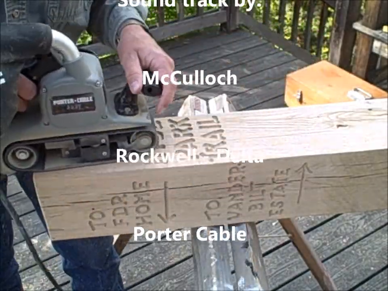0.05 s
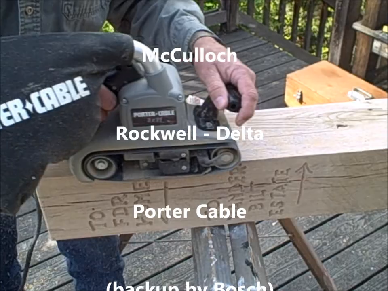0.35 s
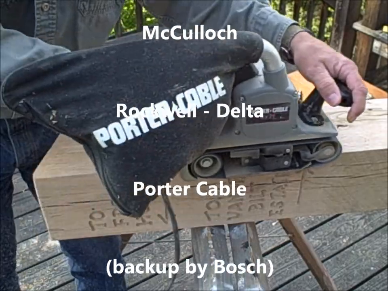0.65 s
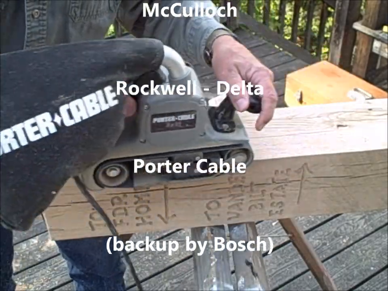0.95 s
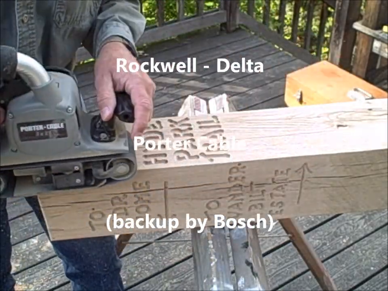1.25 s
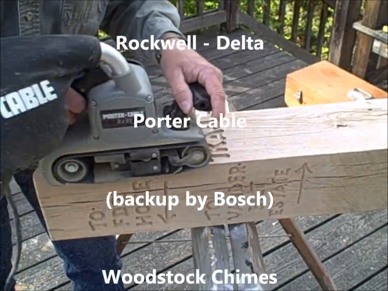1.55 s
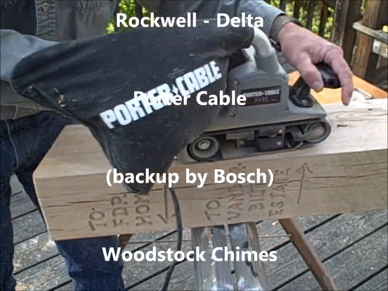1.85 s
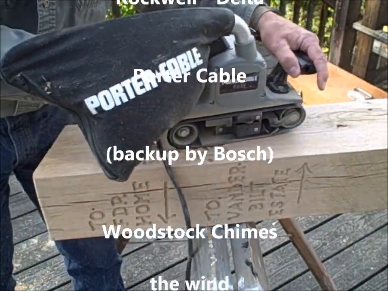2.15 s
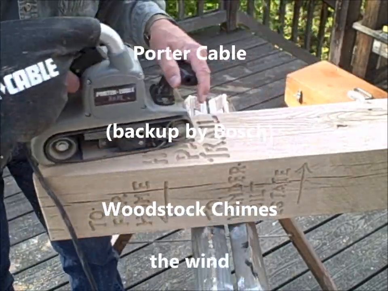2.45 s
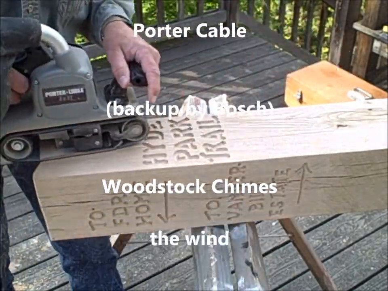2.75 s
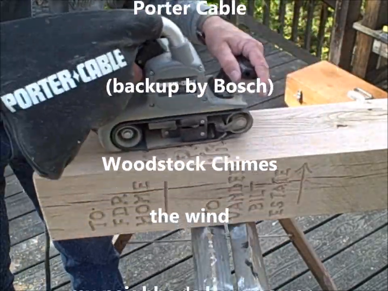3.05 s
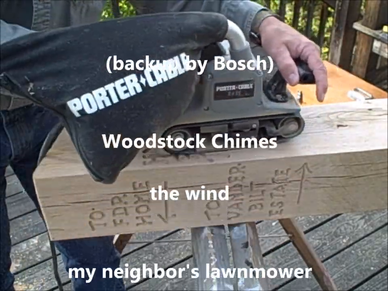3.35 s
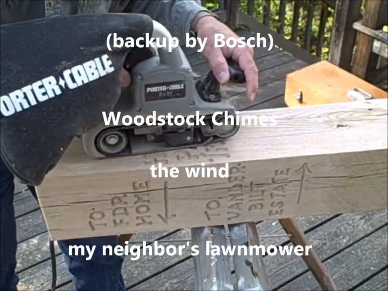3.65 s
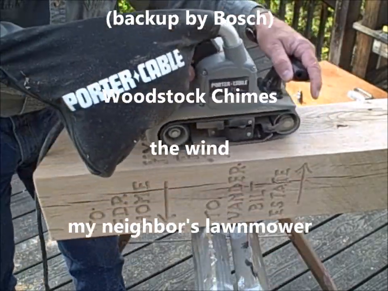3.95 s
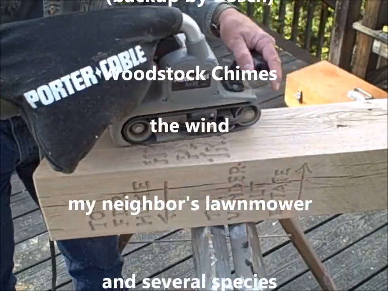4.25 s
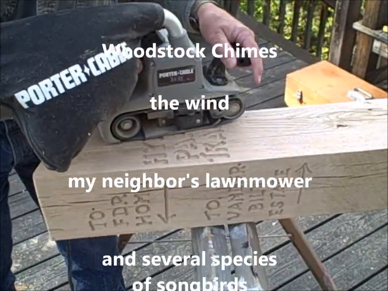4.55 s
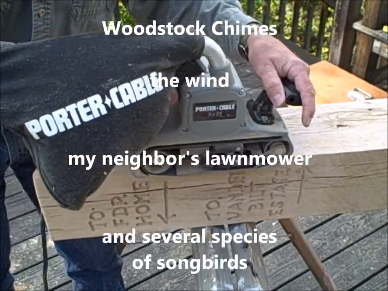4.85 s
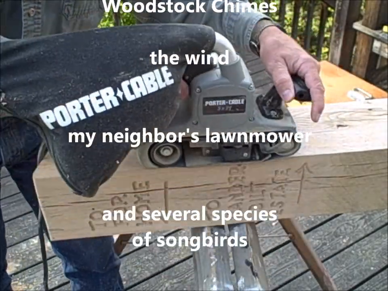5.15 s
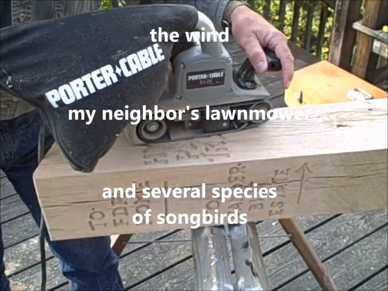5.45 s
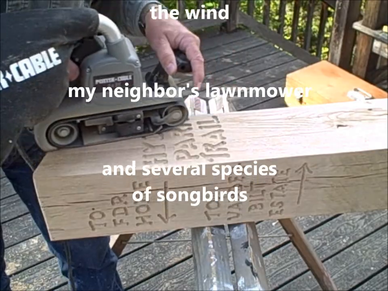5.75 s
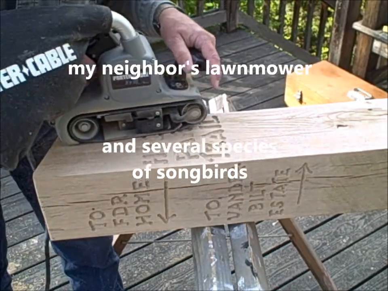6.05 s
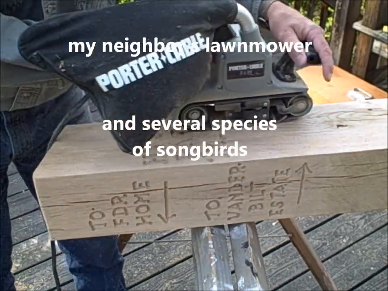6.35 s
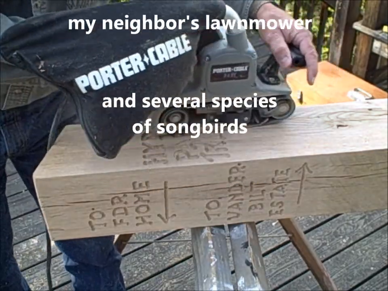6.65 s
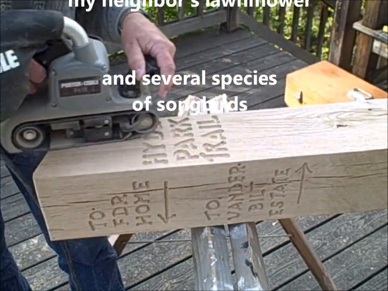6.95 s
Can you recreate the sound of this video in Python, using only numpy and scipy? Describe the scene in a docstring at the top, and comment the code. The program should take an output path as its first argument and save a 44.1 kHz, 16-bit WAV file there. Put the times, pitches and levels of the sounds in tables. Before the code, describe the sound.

A belt sander is already running as it is pushed back and forth along a wooden post. Its motor gives a high, wavering whine over a bright, rapidly throbbing hiss and a rasp of wood. A few splinters tick sharply. The pitch sags slightly around the middle, then recovers, and the rasp eases near the end. It is heard close by, outdoors.

```python
"""A belt sander is pushed to and fro along a wooden post on an open deck, heard close by in mono.
From the start, fan and armature slots whine, a gear drives the roller, and grit tears at the wood
with a hiss that throbs once per roller turn. From half a second on, larger splinters tick.
The motor sags under load and is slowest near 4 s, just after the loudest splinter.
By 6 s it has regained its speed, and in the last second the rasp and hiss ease."""
import sys
import numpy as np
from scipy import signal
from scipy.fft import rfft, irfft, next_fast_len
from scipy.io import wavfile
from scipy.ndimage import map_coordinates

SR = 44100
rng = np.random.default_rng(int(sys.argv[2]) if len(sys.argv) > 2 else 0)


def inscribe(sig):
    """Save sig as 16-bit PCM at rate SR to the path in sys.argv[1].

    A 1-D sig is mono; a 2-D sig holds one channel per row.
    Samples are clipped to [-1, 1] before scaling.
    """
    pcm = np.round(np.clip(np.atleast_2d(sig).T, -1, 1) * 32767)
    wavfile.write(sys.argv[1], SR, pcm.astype(np.int16))


N = 309582
FAN_BLADES, ARMATURE_SLOTS = 12, 11
MESHES_PER_TURN, ROLLER_TEETH = 16 / 3, 45


def from_db(db):
    """Amplitude grows tenfold for every 20 dB."""
    return 10 ** (np.asarray(db) / 20)


def unit_rms(x):
    """Normalisation to an rms of 1."""
    return x / np.sqrt(np.mean(x ** 2) + 1e-20)


def curves(rows):
    """Linear interpolation of each column of a time table at every sample."""
    time_s, *columns = np.transpose(rows)
    return [np.interp(np.arange(N) / SR, time_s, column) for column in columns]


def gain_curves(rows):
    """Linear interpolation in amplitude of each dB column of a time table."""
    time_s, *columns = np.transpose(rows)
    return [np.interp(np.arange(N) / SR, time_s, from_db(db)) for db in columns]


def drift(rate_hz):
    """Low-pass filtered noise: a slow random fluctuation of rms 1."""
    pole = np.exp(-40 * np.pi * rate_hz / SR)
    noise = rng.standard_normal(N // 20 + 2002)   # one value per 20 samples
    slow = signal.lfilter([1], [1, -2 * pole, pole * pole], noise)[2000:]
    return np.interp(np.arange(N) / 20, np.arange(len(slow)), unit_rms(slow))


def coloured(x, spectrum):
    """Source and filter: a frequency response shapes the excitation x; rms 1."""
    hz, db = np.transpose(spectrum)
    size = next_fast_len(N)
    bins_hz = np.maximum(np.fft.rfftfreq(size, 1 / SR), 1)
    gain = from_db(np.interp(np.log(bins_hz), np.log(hz), db, left=-80, right=-80))
    return unit_rms(irfft(rfft(x, size) * gain, size)[:N])


def grit(per_s, spread_db):
    """Shot noise: countless tiny fractures of uneven size at random instants; rms 1."""
    fractures = rng.random(N) < per_s / SR
    return unit_rms(fractures * rng.standard_normal(N) * from_db(spread_db * rng.standard_normal(N)))


def partials(cycles, orders, flutter_db, flutter_hz):
    """Rotational orders: tones at fixed multiples of a rotation rate, each fluttering on its own."""
    tones = 0
    for order, db in orders:
        amplitude = np.sqrt(2) * from_db(db + flutter_db * drift(flutter_hz))
        tones += amplitude * np.sin(2 * np.pi * (order * cycles + rng.random()))
    return tones


# The post shaking under the roller: time_s, hum_db, judder_db
SHAKE_LEVELS = [(0.0, -90, -84), (0.12, -73, -76), (0.17, -75, -74), (0.33, -77, -87), (0.39, -78, -74),
                (0.49, -70, -84), (0.6, -77, -75), (0.68, -84, -84), (0.74, -78, -89), (0.8, -80, -75),
                (0.94, -71, -80), (1.04, -80, -80), (1.17, -74, -78), (1.54, -79, -71), (1.56, -80, -73),
                (1.9, -79, -76), (1.93, -73, -83), (2.01, -72, -75), (2.21, -83, -83), (2.4, -70, -79),
                (2.54, -79, -78), (2.79, -73, -76), (2.87, -70, -67), (2.95, -72, -76), (3.13, -83, -78),
                (3.17, -72, -80), (3.26, -71, -75), (3.46, -85, -77), (3.62, -73, -81), (3.68, -74, -68),
                (3.71, -66, -78), (3.77, -74, -71), (3.81, -70, -69), (4.03, -70, -74), (4.14, -74, -81),
                (4.38, -71, -72), (4.5, -75, -82), (4.91, -74.5, -78), (5.18, -85, -81), (5.3, -81, -71),
                (5.51, -77, -90), (5.59, -76, -79), (5.85, -84, -81), (5.87, -78, -82), (6.1, -74, -72),
                (6.16, -81, -77), (6.26, -82, -88), (6.43, -91, -85), (6.51, -79, -82), (6.61, -85, -85),
                (6.8, -77, -79), (6.88, -89, -85), (7.02, -79, -87)]
# Spectrum of the rumble around the hum: frequency_hz, gain_db
RUMBLE_SPECTRUM = [(20, -1), (45, -3), (62, 3), (80, -2), (97, -10), (130, -20), (300, -40)]
# Partials of the roller's knock: cycles_per_turn, level_db
KNOCK_ORDERS = [(3, -5.5), (4, -11.5)]
# Spectrum of the sander's bouncing: frequency_hz, gain_db
JUDDER_SPECTRUM = [(85, -20), (105, 0), (120, -2), (135, -.5), (155, -1), (180, -11), (300, -28)]


def shake(roller_turns):
    """Forced vibration: the roller presses twice a turn, a hum; the bouncing sander adds judder."""
    hum_db, judder_db = curves(SHAKE_LEVELS)
    hum = partials(roller_turns, [(2, -1.0)], flutter_db=1.5, flutter_hz=6)
    hum += from_db(-3.5) * coloured(rng.standard_normal(N), RUMBLE_SPECTRUM)
    judder = partials(roller_turns, KNOCK_ORDERS, flutter_db=2.5, flutter_hz=4)
    judder += from_db(-3.0) * coloured(rng.standard_normal(N), JUDDER_SPECTRUM)
    return from_db(hum_db) * hum + from_db(judder_db) * judder


# Mesh tone and tooth whistle of the gear: time_s, mesh_db, whistle_db
GEAR_LEVELS = [(0.0, -61.0, -60), (0.23, -69, -62), (0.45, -66, -61), (0.68, -61.0, -73), (0.91, -57, -72),
               (1.13, -63.0, -60), (1.36, -63, -62.0), (1.59, -66.0, -58.5), (1.81, -61.5, -67),
               (2.04, -60.5, -59.5), (2.26, -63, -62), (2.49, -56.5, -58.0), (2.72, -66, -53.5),
               (2.94, -69, -54.5), (3.17, -59.5, -61), (3.4, -64, -70.0), (3.62, -61.0, -65),
               (3.85, -60.0, -74), (4.08, -60, -68.0), (4.3, -61.0, -62.0), (4.53, -69, -68.0),
               (4.76, -62, -73), (4.98, -61.0, -68.0), (5.21, -64.0, -69.0), (5.43, -75, -71),
               (5.66, -66, -63), (5.89, -71.0, -65.0), (6.11, -76.0, -65), (6.34, -68, -65.0),
               (6.57, -66, -67.0), (6.79, -69, -70.0), (7.02, -69.0, -68.0)]
# Partials of the tooth whistle: cycles_per_motor_turn, level_db
WHISTLE_ORDERS = [(16, .3), (14.667, -6)]


def gear(motor_turns, wobble):
    """Amplitude modulation: the off-centre gear presses its teeth harder once per roller turn."""
    mesh_gain, whistle_gain = gain_curves(GEAR_LEVELS)
    mesh = mesh_gain * partials(motor_turns, [(MESHES_PER_TURN, 0)], flutter_db=1.9, flutter_hz=5.4)
    whistle = whistle_gain * partials(motor_turns, WHISTLE_ORDERS, flutter_db=2.2, flutter_hz=15)
    return mesh * (1 + 0.56 * wobble) + whistle * (1 + 0.51 * wobble)


# Whine of the armature slots: time_s, fundamental_db, overtones_db
SLOT_LEVELS = [(0.0, -66, -59.5), (0.23, -62, -70.0), (0.38, -62.5, -66.5), (0.45, -57.5, -68.5),
               (0.52, -55.5, -58.0), (0.61, -60, -53), (0.75, -64.5, -69.0), (0.87, -60, -51.5),
               (0.98, -53, -52), (1.05, -54.5, -56), (1.15, -67, -62.0), (1.27, -57, -63.5),
               (1.37, -65, -60.0), (1.62, -60.0, -67.5), (1.73, -56.0, -59.0), (1.82, -59, -55),
               (2.03, -69.0, -69), (2.15, -63.0, -63.0), (2.31, -77.5, -65.5), (2.58, -62, -57),
               (2.77, -58.5, -69.0), (2.92, -63, -65.5), (2.98, -56, -64.0), (3.14, -69.0, -61.0),
               (3.37, -69, -71.5), (3.67, -76.0, -63), (3.9, -63.0, -66.0), (4.24, -66, -71.5),
               (4.53, -62, -56.5), (4.69, -68, -60.5), (4.85, -65.0, -62.0), (4.98, -59, -58),
               (5.2, -62, -58.5), (5.3, -58.5, -67.5), (5.37, -65.0, -72.5), (5.48, -79.5, -62.5),
               (5.62, -63.5, -64.0), (5.72, -65.5, -59.5), (6.11, -67.5, -74.0), (6.23, -64, -61.0),
               (6.55, -78.5, -77.5), (7.02, -67, -65)]
# Harmonics 2 to 4 of the slot tone: cycles_per_turn, level_db
SLOT_ORDERS = [(22, -1), (33, -17), (44, -20)]


def armature(motor_turns):
    """Slot-passing tone: the armature sings at shaft speed times slot count, just below the fan."""
    tone_gain, overtone_gain = gain_curves(SLOT_LEVELS)
    tone = partials(motor_turns, [(ARMATURE_SLOTS, -.2)], flutter_db=2.4, flutter_hz=25)
    overtones = partials(motor_turns, SLOT_ORDERS, flutter_db=1.0, flutter_hz=23)
    return tone_gain * tone + overtone_gain * overtones


# The fan's fundamental, swelling and fading as the sander moves: time_s, level_db
FAN_LEVEL = [(0.0, -49), (0.12, -49), (0.18, -51.5), (0.21, -71.0), (0.28, -47.5), (0.33, -45.5),
             (0.46, -68.5), (0.52, -52), (0.57, -67.0), (0.67, -53), (0.72, -59), (0.91, -63.0),
             (0.97, -51.5), (1.06, -51), (1.11, -63), (1.15, -50.0), (1.19, -49.5), (1.27, -60),
             (1.41, -51.5), (1.44, -55.0), (1.5, -51.5), (1.58, -74.0), (1.65, -49.5), (1.7, -59),
             (1.82, -47.5), (1.86, -52), (1.9, -48.5), (1.98, -54.0), (2.09, -49.0), (2.19, -49.0),
             (2.23, -47.0), (2.3, -50.5), (2.33, -46.5), (2.41, -48.5), (2.5, -63.0), (2.57, -56),
             (2.6, -49), (2.65, -51), (2.76, -57.5), (2.82, -58.0), (2.92, -50.5), (2.96, -55),
             (3.02, -50.5), (3.05, -54.0), (3.14, -48.0), (3.21, -47.5), (3.3, -61), (3.34, -55.0),
             (3.44, -51.5), (3.48, -59), (3.56, -57), (3.6, -49.5), (3.83, -55), (3.91, -52), (3.97, -55.5),
             (4.08, -49.5), (4.2, -60), (4.29, -47), (4.31, -47), (4.34, -56), (4.4, -46), (4.52, -48.5),
             (4.59, -47.5), (4.67, -43.5), (4.72, -44.0), (4.78, -57.5), (4.82, -48.5), (4.88, -54),
             (4.92, -48), (5.0, -67), (5.08, -52), (5.19, -67.5), (5.25, -50.0), (5.34, -51.0), (5.42, -63),
             (5.52, -48.5), (5.64, -47), (5.74, -49), (5.79, -63), (5.83, -52), (5.89, -54.5),
             (5.98, -50.0), (6.03, -52.5), (6.11, -50.5), (6.17, -51.0), (6.31, -50.0), (6.37, -55),
             (6.41, -51), (6.46, -60), (6.53, -53.0), (6.63, -51.5), (6.69, -54.0), (6.84, -49.0),
             (6.91, -58.5), (6.94, -53.5), (7.02, -67)]
# The fan's harmonics: time_s, second_db, third_db, fourth_db
FAN_HARMONICS = [(0.0, -71.5, -64.0, -79.0), (0.06, -73.5, -65.0, -79.0), (0.17, -52, -62.5, -79.5),
                 (0.32, -55, -56.5, -80.0), (0.47, -67.0, -67.5, -83.5), (0.57, -57.5, -64.0, -72.0),
                 (0.72, -73.0, -66.0, -86.5), (0.82, -73.0, -68.5, -76.0), (0.92, -58.5, -59.5, -63.5),
                 (1.01, -56.0, -69.5, -65.5), (1.14, -62, -61.5, -69.0), (1.35, -54, -56, -65.0),
                 (1.46, -59, -54.0, -84.5), (1.59, -55, -63.0, -71.5), (1.67, -59, -65.0, -80.0),
                 (1.94, -59, -63.5, -65.0), (2.03, -70.0, -64.5, -80.5), (2.16, -56.0, -63.0, -69.5),
                 (2.29, -56.0, -61.5, -64.5), (2.42, -70.5, -69.5, -72.5), (2.61, -70.5, -61, -79.5),
                 (2.75, -70.5, -62.5, -60), (2.88, -70.5, -60, -62.0), (2.99, -72.5, -61.5, -78.5),
                 (3.15, -67.5, -64, -70.5), (3.26, -59.5, -58.5, -63.5), (3.43, -60.0, -67, -60.0),
                 (3.57, -55, -63.0, -62.5), (3.68, -60, -60.0, -68.5), (3.82, -55, -60.0, -62.5),
                 (4.0, -55.5, -63.5, -62.5), (4.19, -62.0, -58.5, -63), (4.44, -57, -60.0, -64.0),
                 (4.59, -54, -61.5, -67), (4.86, -62, -65, -78.0), (5.15, -57.5, -70.0, -86.5),
                 (5.4, -68.5, -65.5, -66.5), (5.63, -56, -66.0, -72.0), (6.13, -67, -70.5, -86.5),
                 (6.33, -55.5, -65.5, -81.5), (6.5, -59.5, -66.0, -66.0), (7.02, -65.0, -71.0, -81.5)]


def fan(motor_turns):
    """Blade-passing tone: the blades chop the air periodically, as in a siren."""
    blade_passes = motor_turns * FAN_BLADES
    fundamental_gain, = gain_curves(FAN_LEVEL)
    whine = fundamental_gain * partials(blade_passes, [(1, 0)], flutter_db=0.8, flutter_hz=40)
    for harmonic, gain in enumerate(gain_curves(FAN_HARMONICS), start=2):
        whine += gain * partials(blade_passes, [(harmonic, -.3)], flutter_db=2.6, flutter_hz=25)
    return whine


# Spectrum of the rasping wood: frequency_hz, gain_db
RASP_SPECTRUM = [(60, -22), (200, -15.5), (280, -10.5), (400, -4.5), (480, -6.5), (580, -3.5), (780, -5.5),
                 (1000, -5), (1300, 0), (1550, -1.5), (1900, -2), (2500, -24), (4000, -50)]
# The timber's two resonances: centre_hz, bandwidth_hz, gain_db
TIMBER_MODES = [(685, 220, -1.5), (963, 280, -1)]
# Their excitation, set by where the belt bears: time_s, low_mode_db, high_mode_db
MODE_LEVELS = [(0.0, -59, -60), (0.29, -63, -58.5), (0.39, -59, -62), (0.47, -69, -56.5), (0.82, -65, -60),
               (0.96, -64, -56), (1.43, -77, -58.5), (1.49, -59, -59), (1.52, -70, -60), (1.84, -59, -60),
               (1.88, -69, -59), (1.95, -57.5, -64), (2.03, -63, -61), (2.13, -59.5, -61.5),
               (4.81, -60, -59), (4.83, -64, -55), (4.89, -62, -71), (4.96, -69, -61), (5.3, -67, -61.5),
               (5.41, -60.5, -59.5), (6.14, -63, -64), (6.18, -70, -55.5), (6.28, -60.5, -63.5),
               (6.8, -62.5, -64), (7.02, -65, -62)]
# Partials of the rotor's buzz: cycles_per_turn, level_db
BUZZ_ORDERS = [(1, -21.5), (2, -38), (4, -17.5), (5, -26), (10, -30), (15, -16), (20, -21)]


def post(motor_turns, wobble, rasp_db):
    """Driven resonance: the timber rasps and rings under the belt and buzzes with the rotor."""
    rasp = from_db(-0.62 + .5 * wobble) * coloured(grit(per_s=20000, spread_db=2.4), RASP_SPECTRUM)
    ring = 0
    for level_db, (hz, width_hz, gain_db) in zip(curves(MODE_LEVELS), TIMBER_MODES):
        band = signal.butter(2, [hz - width_hz / 2, hz + width_hz / 2], "band", fs=SR, output="sos")
        ring += from_db(level_db + gain_db) * unit_rms(signal.sosfilt(band, rng.standard_normal(N)))
    buzz = partials(motor_turns, BUZZ_ORDERS, flutter_db=1.5, flutter_hz=5.3)
    return from_db(rasp_db) * (rasp + buzz) + ring


# Large splinters catching: start_s, level_db
LARGE_SPLINTERS = [(0.5024, -29), (1.5878, -30), (2.9933, -29), (3.5374, -33), (3.5754, -31), (3.709, -24),
                   (4.85, -36), (5.2814, -32)]


def splinters(hiss_db, chips_per_s, decay_s):
    """Brittle fracture: large fibres and small chips snap in bright, exponentially decaying bursts."""
    chip_db = hiss_db + 5 + 1.5 * rng.standard_normal(N)
    snaps = (rng.random(N) < chips_per_s / SR) * from_db(chip_db)
    for start_s, level_db in LARGE_SPLINTERS:
        snaps[round(start_s * SR)] += from_db(level_db - 6.5)
    envelope = signal.lfilter([1], [1, -np.exp(-1 / (decay_s * SR))], snaps + 1e-18)
    bright_band = signal.butter(2, [2500, 13000], "band", fs=SR, output="sos")
    return signal.sosfilt(bright_band, envelope * rng.standard_normal(N))


# The sander's place along the post: time_s, position_fraction
SANDER_POSITION = [(0, .38), (.2, .42), (.65, .82), (1.3, .29), (1.95, .83), (2.7, .32), (3.3, .73),
                   (3.7, .57), (4.05, .73), (4.5, .55), (5.1, .74), (5.9, .43), (6.55, .81), (7.02, .3)]


def with_reflection(direct, echo_db, shortest_s, sweep_s):
    """Comb filtering: an echo off the timber, its delay following the stroke, makes the hiss swish."""
    position, = curves(SANDER_POSITION)
    lag_samples = (shortest_s + sweep_s * position) * SR
    echo = map_coordinates(direct, [np.arange(N) - lag_samples], order=3)
    return direct + from_db(echo_db) * echo


# Spectrum of the belt's scrape: frequency_hz, gain_db
SCRAPE_SPECTRUM = [(2800, -42), (3600, -9), (4300, 2), (4800, 1.5), (5400, 1), (6000, 0), (6700, -1.5),
                   (7400, 1.5), (8500, -15), (11000, -40)]
# Spectrum of the fine dust: frequency_hz, gain_db
DUST_SPECTRUM = [(9000, -29), (12000, -3), (13500, 0), (15000, 0), (16000, -3)]
# Spectrum of the grit's hiss: frequency_hz, gain_db
HISS_SPECTRUM = [(5000, -26), (7000, -5.5), (8200, 1.5), (8600, .4), (9400, -0.3), (10200, -0.8),
                 (10800, 2), (11600, -0.7), (12600, -1.5), (13300, -3.3), (14300, -3), (15000, -7),
                 (16000, -6)]
# Spectrum of the air in the housing: frequency_hz, gain_db
RUSH_SPECTRUM = [(1300, -20), (1900, -4.5), (2350, 1), (2700, -1.5), (3100, -4.5), (3600, -3.5),
                 (4300, -13), (6000, -14)]


def belt(wobble, rush_db, scrape_db, hiss_db):
    """Abrasion and flow noise: grit cuts in surges as the roller turns; air rushes in the housing."""
    scrape_gain = from_db(scrape_db + 0.2 + 1.4 * wobble + 0.56 * drift(rate_hz=98))
    scrape = scrape_gain * coloured(grit(per_s=30000, spread_db=1.6), SCRAPE_SPECTRUM)
    bite_db = hiss_db - np.mean(hiss_db)   # a harder bite throws finer dust and brightens the top
    dust = from_db(-13 + 1.1 * bite_db) * coloured(rng.standard_normal(N), DUST_SPECTRUM)
    hiss_gain = from_db(hiss_db + .2 + 0.78 * wobble + 0.51 * drift(rate_hz=90))
    hiss = hiss_gain * (coloured(grit(per_s=40000, spread_db=1.2), HISS_SPECTRUM) + dust)
    rush = from_db(rush_db + 1.13) * coloured(rng.standard_normal(N), RUSH_SPECTRUM)
    return with_reflection(scrape + hiss + rush, echo_db=-19.5, shortest_s=.0009, sweep_s=0.00163)


# Shaft speed, sagging as the belt is pressed down: time_s, speed_hz
MOTOR_SPEED = [(0.0, 328.4), (0.18, 329.0), (0.36, 329.0), (0.54, 327.9), (0.72, 328.2), (0.9, 326.3),
               (1.08, 323.9), (1.26, 324.6), (1.44, 325.7), (1.62, 325.4), (1.8, 324.9), (1.98, 326.6),
               (2.16, 327.2), (2.34, 325.2), (2.52, 323.3), (2.7, 323.0), (2.88, 322.3), (3.06, 321.0),
               (3.24, 319.5), (3.42, 318.6), (3.6, 318.5), (3.78, 316.8), (3.96, 316.6), (4.14, 318.7),
               (4.32, 320.4), (4.5, 323.2), (4.68, 325.4), (4.86, 326.4), (5.04, 326.9), (5.22, 327.3),
               (5.4, 326.1), (5.58, 327.1), (5.76, 329.3), (5.94, 331.8), (6.12, 332.1), (6.3, 328.9),
               (6.48, 326.7), (6.66, 326.5), (6.84, 327.1), (7.02, 327.8)]
# Noise of wood, housing, belt and grit through the strokes: time_s, rasp_db, rush_db, scrape_db, hiss_db
STROKE_LEVELS = [(0.0, -55, -54.0, -48, -46.0), (0.14, -54.5, -52.5, -48, -47),
                 (0.29, -54.0, -55, -48, -46.5), (0.43, -55, -53.5, -48, -46),
                 (0.57, -54.5, -53.0, -49.5, -47.5), (0.72, -54, -54, -50.0, -49.0),
                 (0.86, -55, -52, -49.5, -48.5), (1.0, -52.5, -52.5, -49.0, -47),
                 (1.15, -54.0, -52.0, -47.0, -46.0), (1.29, -52.5, -52.5, -47, -45.5),
                 (1.43, -52, -51.5, -47, -46), (1.58, -54, -53.0, -48, -47),
                 (1.72, -53.5, -51.5, -48.5, -47), (1.86, -54.5, -54.0, -49.5, -48.5),
                 (2.01, -54.5, -53, -50.0, -49), (2.15, -55.5, -52.5, -50.0, -48.5),
                 (2.29, -54.5, -52.0, -48, -48.0), (2.44, -54.5, -52, -48.5, -48),
                 (2.58, -54.0, -51.5, -48.5, -46), (2.72, -54.0, -53, -47.5, -46.5),
                 (2.87, -53.5, -53, -48, -46.5), (3.01, -54, -54.5, -47.5, -46),
                 (3.15, -54.5, -53.5, -49.5, -48.0), (3.3, -55, -54.0, -49, -48.0),
                 (3.44, -55, -54.5, -49, -49.5), (3.58, -56, -52, -50.0, -48), (3.72, -55, -53.5, -48, -47),
                 (3.87, -55, -53.0, -47.5, -47.5), (4.01, -54.5, -53.5, -48.5, -47.5),
                 (4.15, -54.0, -54.0, -49, -48.0), (4.3, -54.0, -54.0, -49, -48.0),
                 (4.44, -54.5, -52, -48, -47.5), (4.58, -54.0, -52, -48.5, -47.5),
                 (4.73, -55, -52.5, -48.5, -47.5), (4.87, -55.5, -55.5, -50, -48),
                 (5.01, -54.5, -53.5, -50.5, -48.5), (5.16, -54.5, -53, -50.5, -49.5),
                 (5.3, -57, -55, -51.0, -49.5), (5.44, -56.5, -55.5, -50, -49.5),
                 (5.59, -57, -54.0, -51.5, -49.5), (5.73, -55, -52.5, -50, -49.5),
                 (5.87, -56.5, -55.5, -50.5, -49.5), (6.02, -56.5, -56.0, -50, -49),
                 (6.16, -56, -55.5, -50.5, -49.5), (6.3, -57, -55.5, -52, -51.5),
                 (6.45, -60, -56.0, -53, -53.0), (6.59, -60.5, -56.5, -54, -52.5),
                 (6.73, -61.5, -57, -54.5, -53.5), (6.88, -58.5, -56, -53.5, -52.5),
                 (7.02, -59.5, -58.5, -53.5, -51.5)]


def scene():
    """Superposition: one shaft drives motor, gear and roller; their sounds add, alike in both channels."""
    speed_hz, = curves(MOTOR_SPEED)
    rasp_db, rush_db, scrape_db, hiss_db = curves(STROKE_LEVELS)
    motor_turns = np.cumsum(speed_hz * (1 + 0.00031 * drift(rate_hz=27.3))) / SR
    roller_turns = motor_turns * MESHES_PER_TURN / ROLLER_TEETH
    wobble = np.cos(2 * np.pi * (roller_turns - .75))   # peaks as the roller's high spot meets the wood
    sound = fan(motor_turns) + armature(motor_turns) + gear(motor_turns, wobble)
    sound += belt(wobble, rush_db, scrape_db, hiss_db)
    sound += post(motor_turns, wobble, rasp_db) + shake(roller_turns)
    sound += splinters(hiss_db, chips_per_s=19, decay_s=.0004)
    return np.array([sound, sound])


def record(dry):
    """Band limiting: an elliptic low-pass filter cuts the top steeply."""
    cutoff_hz = 15750
    return signal.sosfilt(signal.ellip(14, .1, 80, cutoff_hz, fs=SR, output="sos"), dry)


dry = scene()
out = record(dry)
inscribe(out)
```